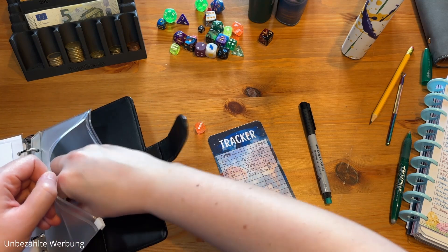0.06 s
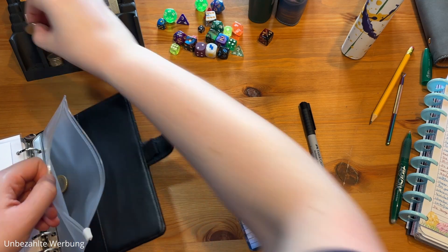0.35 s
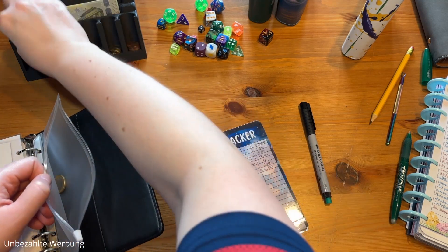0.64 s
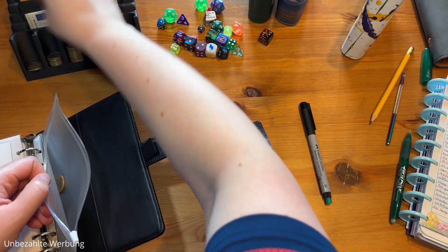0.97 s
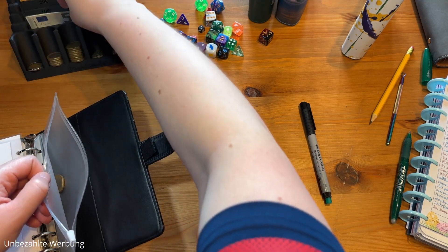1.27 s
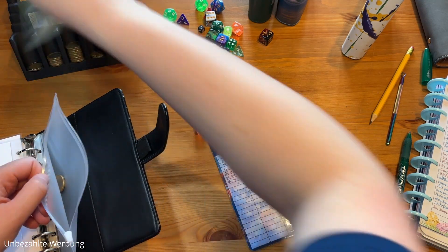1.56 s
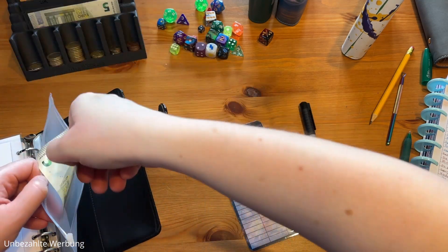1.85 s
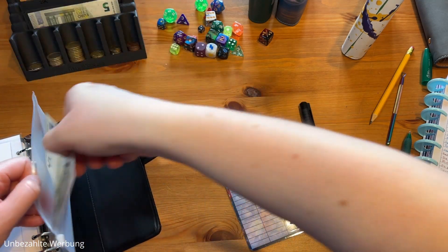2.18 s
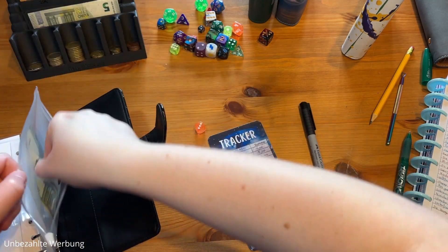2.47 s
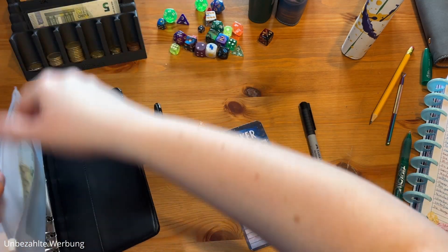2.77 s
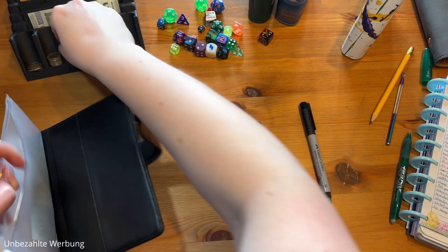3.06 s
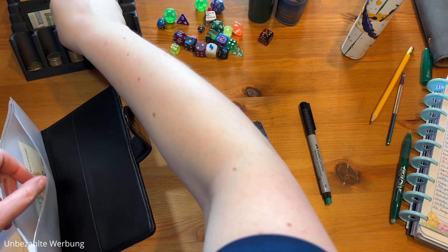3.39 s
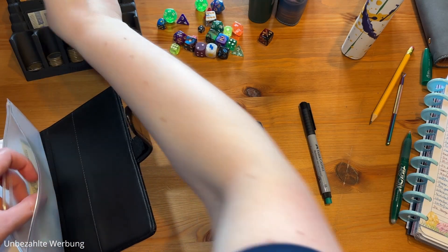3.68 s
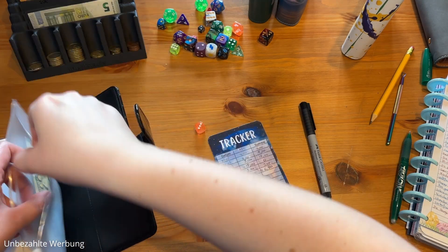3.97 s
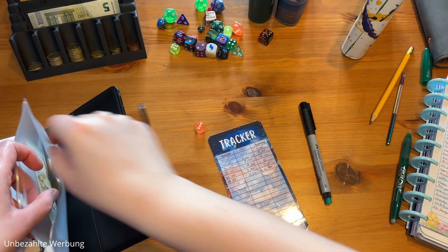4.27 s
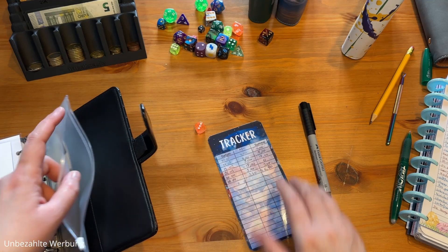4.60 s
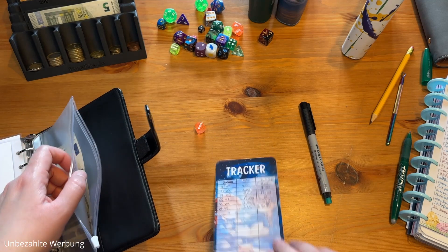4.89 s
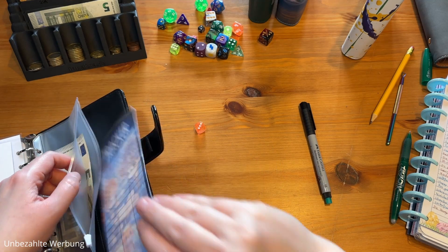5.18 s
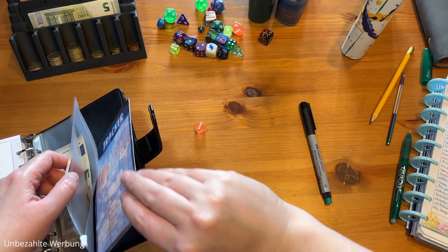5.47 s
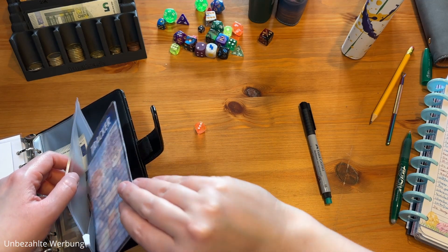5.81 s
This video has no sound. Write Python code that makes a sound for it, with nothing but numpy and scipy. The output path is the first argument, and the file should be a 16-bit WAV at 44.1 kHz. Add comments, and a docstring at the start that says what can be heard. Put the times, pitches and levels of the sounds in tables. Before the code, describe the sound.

The sounds are close to the microphone, on a wooden table in a small room, with a spinning washing machine humming faintly farther off throughout. A plastic pouch rustles lightly for the first half second. From about 0.6 to 1 second, coins scrape and knock loudly in a plastic tray. A banknote rustles from 1 second, the pouch buckles with a hollow crackle at 1.8, and the note crinkles crisply into it until about 2.8. After a lull, coins click and scrape in the tray again from 3.5 to 3.8 seconds. A small rustle follows at 4, and at 4.2 one coin clinks onto another with a short, very high ring, the sharpest sound. A hand softly brushes the table, a card slides off it at around 4.7 seconds, and quiet scratchy ticks continue until about 6 as it is tucked in.

```python
"""Paper rustles and coins scrape and knock out of a plastic tray, close to the microphone, on a wooden
table in a small room. A banknote crinkles into a plastic pouch, one coin clinks onto another with a
short, high ring, and a card is slid off the table and tucked in. The scrapes and rustles are streams of
tiny slips that ring tray, sheet or pouch. Farther off, a spinning washing machine hums faintly."""
import sys
import numpy as np
from scipy import signal
from scipy.fft import rfft, irfft, next_fast_len
from scipy.io import wavfile

SR = 44100
rng = np.random.default_rng(int(sys.argv[2]) if len(sys.argv) > 2 else 0)


def file_out(sig):
    """Save sig as 16-bit WAV at sys.argv[1]."""
    # one column per channel
    cols = np.atleast_2d(sig).T
    # limit, then scale
    lim = np.clip(cols, -1, 1)
    pcm = np.round(lim * 32767).astype(np.int16)
    wavfile.write(sys.argv[1], SR, pcm)


N = 261954
T = np.arange(N) / SR

# Likeness of left and right, for close and for diffuse sound. Each row: frequency in Hz, correlation.
CLOSE = [(500, 1), (850, 0.33), (1600, 0.6), (2600, 0.12), (6500, 0.9), (15000, 0.99)]
DIFFUSE = [(50, 0.78), (150, 0.88), (400, 0.2), (1200, 0.33), (14000, 0.1)]
# The modes of a coin. Each row: frequency in Hz, relative level in dB, t60 in seconds.
COIN_MODES = [ (13915, 0, .024), (13445, -14, .045), (13945, -20, .17), (13465, -30, .18), (14020, -21, .1),
              ]


def from_db(db):
    """Decibels to gain."""
    return 10 ** (np.asarray(db) / 20)


def rms_one(x):
    """Scale to unit rms."""
    return x / np.sqrt(np.mean(x ** 2) + 1e-20)


def at_hz(points, hz):
    """Read a table on a log-frequency axis."""
    points = np.array(points)
    return np.interp(np.log(hz), np.log(points[:, 0]), points[:, 1])


def band(x, low_hz, high_hz, order=3):
    """Causal band-pass."""
    sos = signal.butter(order, [low_hz, min(high_hz, .45 * SR)], "band", fs=SR, output="sos")
    return signal.sosfilt(sos, x)


def add(out, start, sound):
    """Mix a sound in at a start time in seconds."""
    at = max(round(start * SR), 0)
    out[:, at:at + sound.shape[-1]] += sound[..., :N - at]


def stroke(start, length_s):
    """The samples from the start of a stroke until it has died away."""
    return slice(max(int(start * SR), 0), int((start + length_s + .2) * SR))


def stroke_gains(strokes, sag_db, release_s, curve):
    """One gain curve per dB column: each stroke swells, sags as the hand slows, and dies once it stops."""
    total = np.zeros((len(strokes[0][3:]), N))
    for start, swell_s, length_s, *levels_db in strokes:
        part = stroke(start, length_s)
        t = np.maximum(T[part] - start, 0)
        swell = np.minimum(t / swell_s, 1) ** curve
        slowing = np.clip((t - swell_s) / max(length_s - swell_s, 1e-3), 0, 1)
        shape = swell * from_db(-sag_db * slowing) * np.exp(-np.maximum(t - length_s, 0) / release_s)
        total[:, part] += (from_db(levels_db)[:, None] * shape) ** 2
    return np.sqrt(total)


def drift(rate_hz):
    """A smooth random wander of unit rms."""
    hop, settle = 40, 2000
    r = np.exp(-2 * np.pi * rate_hz * hop / SR)
    slow = signal.lfilter([1], [1, -2 * r, r * r], rng.standard_normal(N // hop + settle + 2))[settle:]
    return np.interp(np.arange(N) / hop, np.arange(len(slow)), rms_one(slow))


def grains(per_s, spread_db):
    """Random tiny slips of uneven size, each a burst of noise in both channels."""
    sizes = from_db(spread_db * np.minimum(rng.exponential(1, N), 4))
    slips = sizes * (rng.random(N) < per_s / SR)
    envelope = np.sqrt(signal.lfilter([1], [1, -.93], slips ** 2 + 1e-12))
    return rms_one(envelope * rng.standard_normal((2, N)))


def stereo(pair, likeness, spectrum=None):
    """Turn two unrelated noises into left and right with a given likeness and colour."""
    size = next_fast_len(pair.shape[-1])
    hz = np.maximum(np.fft.rfftfreq(size, 1 / SR), 1)
    alike = np.clip(at_hz(likeness, hz), -.98, .98)
    mid, side = rfft(pair, size) * (from_db(at_hz(spectrum, hz)) if spectrum else 1)
    both = np.sqrt(1 + alike) * mid + np.sqrt(1 - alike) * side * [[1], [-1]]
    return rms_one(irfft(both, size)[:, :pair.shape[-1]])


def contact(t60, rise_s):
    """A brief rattle of micro-contacts: noise that rises fast and dies away."""
    t = T[:SR // 4]
    noise = stereo(rng.standard_normal((2, len(t))), CLOSE)
    return noise * from_db(-60 * t / t60) * (1 - np.exp(-t / rise_s))


def blow(sound, bands_hz, levels_db):
    """Set each band of a blow to a level: its rms if all its energy fell within 20 ms."""
    parts = [from_db(db) * rms_one(band(sound, *edges)) for edges, db in zip(bands_hz, levels_db)]
    return sum(parts) * np.sqrt(.02 * SR / sound.shape[-1])


def resonate(x, modes, direct_db):
    """A body's resonances in parallel, alternating in sign, plus the bare contact."""
    out = from_db(direct_db) * x
    for k, (hz, width_hz, db) in enumerate(modes):
        r = np.exp(-np.pi * width_hz / SR)
        feed = np.array([1, 0, -1]) * (1 - r * r) / 2
        feedback = [1, -2 * r * np.cos(2 * np.pi * hz / SR), r * r]
        out = out + (-1) ** k * from_db(db) * signal.lfilter(feed, feedback, x)
    return out


def hollow(x, centre_hz, width_hz):
    """A resonance whose centre may move; unit rms."""
    turn = np.exp(2j * np.pi * np.cumsum(centre_hz * np.ones(x.shape[-1])) / SR)
    r = np.exp(-np.pi * width_hz / SR)
    return rms_one((turn * signal.lfilter([1], [1, -r], x / turn)).real)


def washer():
    """Away from the table, motor and mains tones waver over the low rush of the drum."""
    # Motor and mains tones. Each row: frequency in Hz, level in dB before the overall gain.
    hum = [(120, -69), (148, -77.5), (367, -78.5)]
    # The colour of the drum. Each row: frequency in Hz, relative level in dB.
    drum_colour = [(25, -23.5), (48, -5), (130, -1.5), (200, -9), (400, -13.5), (750, -27), (2700, -28.5),
                   (4500, -32), (12000, -45.5)]
    # The washer's level dips briefly. Each row: time in seconds, overall gain in dB.
    overall_gain = [(4.85, 5), (5.05, 0.5), (5.65, 0.5), (5.9, 5.5)]
    tones = np.zeros(N)
    for hz, db in hum:
        amplitude = from_db(db + 0.6 * drift(1.1)) * np.sqrt(2)
        tones += amplitude * np.sin(2 * np.pi * hz * T + 0.5 * drift(1.2))
    rush = from_db(-68.5) * stereo(rng.standard_normal((2, N)), DIFFUSE, drum_colour)
    return from_db(np.interp(T, *np.transpose(overall_gain))) * (tones + rush)


def room(x):
    """The small room returns diffuse reflections that die faster in the treble."""
    # The decay of the room. Each row: frequency in Hz, t60 in seconds.
    decay = [(150, 0.38), (1000, 0.3), (5000, 0.31), (14000, 0.1424)]
    t, edges = T[:SR // 2], np.geomspace(80, 18000, 9)
    noise = stereo(rng.standard_normal((2, len(t))), DIFFUSE)
    tail = sum(band(noise, low, high, order=2) * from_db(-60 * t / at_hz(decay, np.sqrt(low * high)))
               for low, high in zip(edges, edges[1:]))
    tail *= np.clip((t - .003) / 0.0025, 0, 1)  # reflections begin after 3 ms
    return signal.fftconvolve(x, rms_one(tail) / np.sqrt(len(t)), axes=1)[:, :N]


def microphone_ports(x):
    """The microphone's housing gives left and right a different level and phase at each frequency."""
    # How the ports hear the table. Each row: frequency in Hz, left minus right in dB, left lead in rad.
    ports = [(220, 0.5, 0.4), (477, 2, 0.86), (698.5, 3.5, 1.23), (1269, 3.5, 0.5), (1538, -7.5, 3),
             (1770, -1.5, -0.46), (2484, 9, 2), (3674, 0.5, 0.66), (4800, 6, -0.23), (7660, 3, 1.75),
             (11450, -1, -3.5), (13910, 0, -5.5)]
    size = next_fast_len(N + SR // 10)
    hz = np.maximum(np.fft.rfftfreq(size, 1 / SR), 1)
    balance_db = at_hz(np.array(ports)[:, [0, 1]], hz)
    lead_rad = at_hz(np.array(ports)[:, [0, 2]], hz)
    lean = np.array([[.5], [-.5]])
    response = from_db(lean * balance_db) * np.exp(1j * lean * lead_rad)
    return irfft(rfft(x, size) * response, size)[:, :N]


def hand_brush():
    """Skin on the wooden table makes a soft, dull rush."""
    # A sweep of the hand. Each row: start, swell and length in seconds, level in dB.
    sweeps = [(4.34, 0.16, 0.22, -61.5)]
    gain = stroke_gains(sweeps, sag_db=19.0, release_s=0.02, curve=0.83)[0]
    friction = stereo(rng.standard_normal((2, N)), CLOSE)
    return gain * rms_one(band(friction, 280, 856))


def finger_taps():
    """Soft contacts of the hand ring tray or table at the pitch of the spot touched."""
    # Bumps of fingers and wrist. Each row: start in seconds, level in dB, pitch in Hz.
    taps = [(0.131, -49.5, 1710), (0.192, -54.5, 72), (1.057, -61, 1400), (3.081, -65, 1710),
            (4.933, -71, 1033)]
    out = np.zeros((2, N))
    for start, db, hz in taps:
        touch = contact(t60=0.086, rise_s=0.0056)
        rung = rms_one(touch) + hollow(touch, hz, width_hz=190)
        add(out, start, blow(rung, [(hz / 2, hz * 2)], [db]))
    return out


def sheet_flexes():
    """Stiff edges catch and slip in scratchy ticks; the sheet rings at a pitch set by how it is bent."""
    # Bends of the sheet. Each row: start, swell and length in seconds, level in dB, pitch in Hz.
    flexes = [(4.0, 0.0251, 0.1464, -60.5, 1790), (4.203, .005, 0.13, -58.5, 1800),
              (4.814, 0.051, 0.1, -64.5, 2100), (5.253, 0.014, 0.066, -67, 2040),
              (5.381, 0.088, 0.17, -70.5, 2400), (5.546, 0.023, 0.036, -69.5, 2690),
              (5.77, 0.0056, 0.048, -66, 3700), (5.845, 0.11, 0.16, -69, 1280)]
    # The colour of the slips. Each row: frequency in Hz, relative level in dB.
    colour = [(500, -11), (1300, -8.5), (3400, -9), (6500, -15), (9000, -25.5)]
    out = np.zeros((2, N))
    slips = stereo(grains(per_s=1300, spread_db=2.2), CLOSE, colour)
    for start, swell_s, length_s, db, hz in flexes:
        part = stroke(start, length_s)
        sheet = rms_one(slips[:, part] + hollow(slips[:, part], hz, width_hz=650))
        gain = stroke_gains([(start, swell_s, length_s, db)], sag_db=10.5, release_s=0.0071, curve=0.48)
        out[:, part] += gain[0, part] * sheet
    return out


def pouch_buckles():
    """Quick slips of the stiff plastic make the open pouch sound hollow."""
    # The pouch buckles as it is pushed open. Each row: start, swell and length in seconds, level in dB.
    buckles = [(1.778, 0.022, 0.023, -44.5), (1.815, 0.023, 0.05, -47.5)]
    # Resonances of the open pouch. Each row: frequency and width in Hz, relative level in dB.
    pouch_modes = [(430, 50, -1.5), (630, 20, 0), (1150, 91, -9), (1469, 26, 0.5), (2180, 100, -9.5)]
    slips = stereo(grains(per_s=570, spread_db=4.0), CLOSE)
    gain = stroke_gains(buckles, sag_db=12.0, release_s=0.0094, curve=0.97)[0]
    return gain * rms_one(resonate(slips, pouch_modes, direct_db=-56))


def crease_snaps():
    """A crease flips with a sharp tick, and the sheet behind it flaps a little longer."""
    # Creases of note and pouch. Each row: start in seconds, then flap, snap and edge levels in dB.
    snaps = [(0.078, -70, -61.5, -56.5), (0.1317, -52, -53.5, -58.5), (0.179, -62, -58.5, -67),
             (0.2097, -61.5, -60.5, -61.5), (1.146, -54.5, -58.5, -50), (1.3928, -50.5, -60, -65),
             (1.607, -57, -60, -96), (1.738, -61.5, -65.5, -74.5), (1.782, -52.5, -55, -60),
             (1.805, -57.5, -59, -75), (1.853, -68, -49, -59.5), (1.922, -63, -53.5, -86),
             (1.947, -53.5, -53.5, -85), (2.035, -53, -57.5, -105), (2.255, -55.5, -54, -51),
             (2.535, -64.5, -56.5, -59), (2.647, -67, -56.5, -65), (3.208, -62.5, -76, -90),
             (3.311, -69.5, -70.5, -70), (3.983, -60.5, -57.5, -64), (4.011, -66.5, -61, -71),
             (4.65, -75.5, -72.5, -81)]
    out = np.zeros((2, N))
    for start, flap_db, snap_db, edge_db in snaps:
        flap = contact(t60=0.09, rise_s=0.00088)
        tick = contact(t60=0.017, rise_s=0.00033)
        add(out, start, blow(flap, [(300, 694), (900, 1770)], [flap_db, flap_db - 4]))
        add(out, start, blow(tick, [(1500, 4200), (6000, 14430)], [snap_db, edge_db]))
    return out


def crinkles(per_s, spread_db):
    """Tiny folds flip at random, each ticking at one of ten pitches."""
    pitches = np.geomspace(1300, 9000, 10)
    sizes = from_db(spread_db * np.minimum(rng.exponential(1, N), 3))
    clicks = sizes * (rng.random(N) < per_s / SR)
    pitch_index = rng.integers(0, len(pitches), N)
    return rms_one(sum(resonate(clicks * (pitch_index == k) + 1e-18, [(hz, hz / 2, 0)], direct_db=-17.5)
                       for k, hz in enumerate(pitches)))


def paper_rubs():
    """Note and card rub on the pouch: friction hiss, crisp crinkles, a ring that wanders with bending."""
    # Strokes. Each row: start, swell and length in seconds, then body, rustle and hiss levels in dB.
    rubs = [(0, 0.00081, 0.22, -55.5, -60, -62), (.115, 0.012, 0.135, -56, -59, -56.5),
            (.24, 0.15, 0.26, -66.5, -64.5, -60), (.455, 0.017, 0.11, -66, -64.5, -57.5),
            (1.04, 0.081, 0.19, -59.5, -63, -62.5), (1.255, 0.16, 0.24, -54.5, -56, -53.5),
            (1.48, 0.046, 0.12, -60.5, -61, -59.5), (1.648, 0.025, 0.056, -100, -63.5, -66),
            (1.765, 0.013, 0.032, -55, -60, -55), (1.945, 0.065, 0.055, -59.5, -52, -52.5),
            (2.188, 0.068, 0.24, -52, -47.5, -47.5), (2.32, 0.1, 0.29, -67, -57.5, -58),
            (2.485, 0.049, 0.1, -60.5, -50, -52), (2.626, 0.016, 0.11, -52.5, -52.5, -50),
            (2.68, 0.047, 0.093, -60.5, -55.5, -55.5), (2.765, 0.041, 0.021, -80, -51.5, -57.5),
            (2.8, 0.038, 0.62, -71.5, -70.5, -71.5), (3.98, 0.052, 0.093, -68.5, -71, -67.5),
            (4.15, 0.087, 0.21, -60, -56.5, -60.5), (4.635, 0.14, 0.2, -63.5, -62.5, -63.5)]
    # The colour of paper friction. Each row: frequency in Hz, relative level in dB.
    colour = [(300, 4), (800, 1.5), (1550, 7), (2100, 0.5), (7000, 7), (8500, -2.5), (14500, -3.5),
              (16000, -8)]
    gains = stroke_gains(rubs, sag_db=14.5, release_s=0.0094, curve=0.48)
    body, rustle, hiss = (gain * from_db(1.3 * drift(23)) for gain in gains)
    crackle = from_db(-7) * crinkles(per_s=380, spread_db=3)
    pressure = from_db(1.6 * drift(45))
    friction = stereo(grains(per_s=10000, spread_db=3.5) * pressure, CLOSE, colour)
    ring_hz = 4000 * from_db(2 * drift(6))
    sheet = friction + crackle + from_db(-10) * hollow(friction, ring_hz, width_hz=800)
    return (body * rms_one(band(sheet, 220, 1800, order=2))
            + rustle * rms_one(band(sheet, 1287, 4750, order=2))
            + hiss * rms_one(band(sheet, 7200, 17360, order=2)))


def tray_ring(x, time_s, direct_db, walls_db):
    """A coin rings the tray on the table and the thin walls of the slot in use at that time."""
    # Resonances of the tray. Each row: frequency and width in Hz, relative level in dB.
    tray_modes = [(180, 88, -0.5), (348, 90, 2), (520, 65, 5), (710, 55, -3), (988, 12, -1), (1187, 70, 5),
                  (1414, 27, 6), (1567, 24, 2), (1730, 33, -5), (2006, 85, -2.5), (2425, 26, -4),
                  (2930, 73, -1.5), (3770, 450, -10)]
    # Slot walls. Each row: the second from which the slot is in use, then four pitches in Hz.
    slot_rings = [(0, 1150, 4210, 4810, 5270), (3, 811, 4400, 5380, 6500)]
    slots = np.array(slot_rings)
    pitches = slots[np.searchsorted(slots[1:, 0], time_s), 1:]
    walls = sum(hollow(x, hz, width_hz=190) * (-1) ** k for k, hz in enumerate(pitches.T))
    return rms_one(resonate(x, tray_modes, direct_db)) + from_db(walls_db) * rms_one(walls)


def coin_slides():
    """Milled coin edges stutter along the slot and shake the tray."""
    # Slides. Each row: start, swell and length in seconds, then rumble, scrape and rasp levels in dB.
    slides = [(.59, 0.0091, 0.071, -48.5, -43.5, -52), (.618, 0.016, 0.15, -80.5, -38.5, -46.5),
              (.655, 0.066, 0.081, -48.5, -46.5, -41.5), (.745, .01, 0.091, -39.5, -37.5, -50.5),
              (.828, 0.019, 0.1436, -45, -37, -42.5), (.9, 0.058, 0.13, -46.5, -47, -60),
              (3.472, 0.0081, 0.25, -50.5, -51.5, -52.5), (3.586, 0.06, 0.12, -46.5, -41, -50.5)]
    rumble, scrape, rasp = stroke_gains(slides, sag_db=14.5, release_s=0.01, curve=0.8)
    slips = stereo(grains(per_s=2600, spread_db=1.8), CLOSE)
    tray = tray_ring(slips, T, direct_db=-8.5, walls_db=-11)
    low = rumble * rms_one(band(tray, 130, 810)) + scrape * rms_one(band(tray, 630, 2100))
    high = rms_one(band(tray, 2600, 6400)) + from_db(-13) * rms_one(band(slips, 8000, 16000))
    return low + rasp * high


def coin_drags():
    """Slips of the milled edge ring the slot's hollow, whose pitch glides as the coin travels."""
    # Drags. Each row: start, swell and length in seconds, level in dB, first and last pitch in Hz.
    drags = [(0.61, 0.011, 0.088, -36, 1260, 1110), (0.647, 0.01, 0.14, -41.5, 770, 990),
             (3.58, 0.0054, 0.054, -42, 1330, 1650), (3.597, 0.041, 0.077, -44.5, 3020, 3030)]
    out = np.zeros((2, N))
    slips = stereo(grains(per_s=2300, spread_db=-4.5), CLOSE)
    for start, swell_s, length_s, db, from_hz, to_hz in drags:
        part = stroke(start, length_s)
        glide_hz = np.interp(T[part], [start, start + length_s], [from_hz, to_hz])
        rung = hollow(slips[:, part], glide_hz, width_hz=220)
        gain = stroke_gains([(start, swell_s, length_s, db)], sag_db=7, release_s=0.0083, curve=0.91)
        out[:, part] += gain[0, part] * rms_one(band(rung, from_hz / 2, from_hz * 1.5, order=2))
    return out


def coin_knocks():
    """Coins hit plastic with a hard blow and a brief rattle: tray and table thud, the metal ticks."""
    # Knocks in tray or pouch. Each row: start in seconds, thud, knock, click and metal levels in dB,
    # contact t60 in seconds, thud pitch in Hz (set by the spot struck).
    knocks = [(0.5909, -50.5, -40, -48, -81.5, 0.026, 296), (0.618, -47, -39, -45.5, -71, 0.054, 486),
              (0.7397, -32.5, -30, -39.5, -51, 0.015, 498), (0.7439, -41.5, -39, -55, -66.5, 0.015, 552),
              (0.826, -41, -33, -31.5, -52, 0.011, 316.5), (0.854, -55.5, -38, -56, -62.5, 0.055, 500),
              (0.862, -43.5, -53.5, -41.5, -71, 0.0093, 520), (0.871, -57.5, -37.5, -37.5, -63, 0.04, 500),
              (0.902, -50, -44, -43.5, -72, 0.016, 381), (0.922, -51.5, -43.5, -48.5, -80, 0.011, 380),
              (3.469, -40, -44.5, -37.5, -40.5, 0.011, 228.6), (3.641, -46, -43, -40.5, -67, 0.044, 567),
              (3.692, -55.5, -49.5, -48.5, -59, 0.018, 500.5),
              (4.264, -62.5, -53, -52.5, -77.5, 0.019, 324.7)]
    out = np.zeros((2, N))
    for start, thud_db, knock_db, click_db, metal_db, t60, thud_hz in knocks:
        rattle = contact(t60, rise_s=0.0026)
        # One impulse, 1 ms in, with as much energy as the rattle.
        strike = np.eye(1, rattle.shape[-1], SR // 1000) * np.sqrt(np.sum(rattle ** 2) / 2)
        tray = tray_ring(rattle + strike, start, direct_db=-13.0, walls_db=-5)
        thud_band = (thud_hz * 0.42, thud_hz * 1.64)
        body = blow(tray, [thud_band, (800, 2200), (2600, 7000)], [thud_db, knock_db, click_db])
        edge = blow(rattle, [(7000, 9700), (12600, 15800)], [click_db - 14, metal_db])
        add(out, start, body + edge)
    return out


def coin_jingles():
    """Coins chatter against each other as they settle, so their ring keeps restarting and shimmers."""
    # Jingles. Each row: start in seconds, level in dB, t60 of the chatter in seconds.
    jingles = [(0, -69, 0.58), (3.47, -46.5, 0.16), (4.218, -38, 0.14), (4.258, -45.5, .11)]
    out = np.zeros((2, N))
    for start, db, t60 in jingles:
        chatter = contact(t60, rise_s=0.0011)
        shimmer = sum(hollow(chatter, hz, width_hz=150) for hz, _, _ in COIN_MODES)
        add(out, start, blow(shimmer, [(13000, 14500)], [db]))
    return out


def coin_clink(start, swell_s, ring_db, knock_db, tick_db, thud_db):
    """A coin drops on another: one hard tick, then a high ring that the pouch soon damps."""
    out, t = np.zeros((2, N)), T[:SR // 3]
    swell = 1 - np.exp(-t / swell_s)
    for hz, db, t60 in COIN_MODES:
        add(out, start, from_db(ring_db + db - 60 * t / t60) * swell * np.sin(2 * np.pi * hz * t))
    strike = np.eye(1, len(t)) * np.ones((2, 1))  # metal on metal: a single impulse
    add(out, start, blow(strike, [(1700, 6400), (6500, 10600)], [knock_db, tick_db]))
    rattle = contact(t60=0.0306, rise_s=0.0046)
    add(out, start, blow(rattle, [(150, 510), (1200, 11000)], [thud_db, thud_db + 6.0]))
    return out


def scene():
    """The table is close to the microphone and sounds into the room; the washer arrives already diffuse."""
    coins = coin_knocks() + coin_slides() + coin_drags() + finger_taps()
    paper = paper_rubs() + crease_snaps() + pouch_buckles() + hand_brush() + sheet_flexes()
    ring = coin_clink(4.218, swell_s=0.0004, ring_db=-10.5, knock_db=-47.5, tick_db=-34.5, thud_db=-49.0)
    ring += coin_jingles()
    reflections = room(from_db(-11) * coins + from_db(-10) * paper + from_db(-14) * ring)
    return microphone_ports(coins + paper + ring + reflections) + washer()


def record(dry):
    """A steep low-pass cuts the treble above 16 kHz."""
    return signal.sosfilt(signal.ellip(10, .1, 80, 16000, fs=SR, output="sos"), dry)


dry = scene()
out = record(dry)
file_out(out)
```